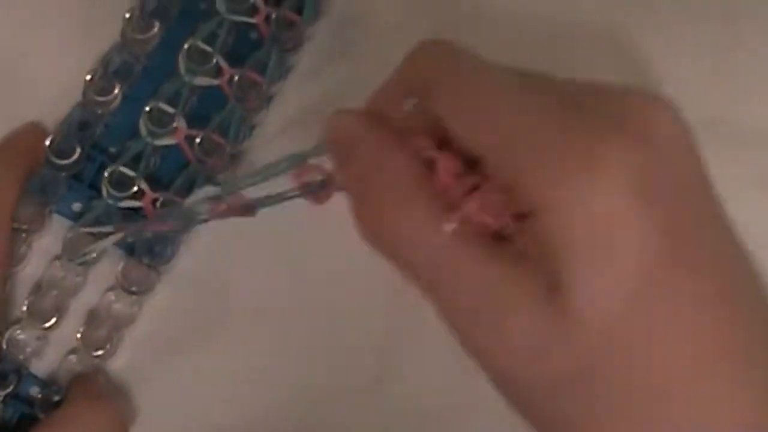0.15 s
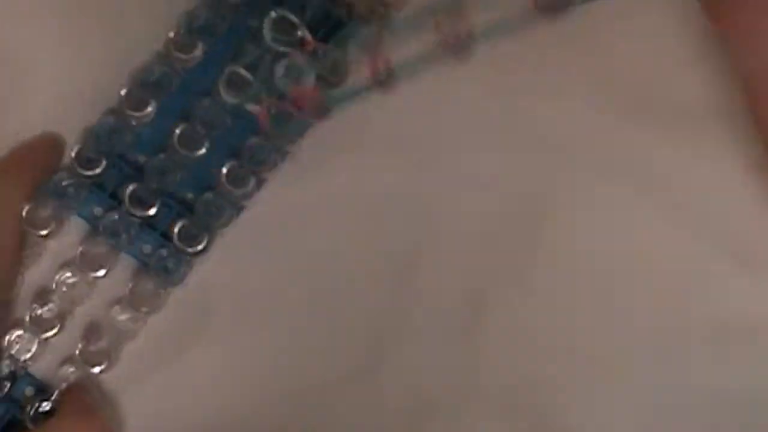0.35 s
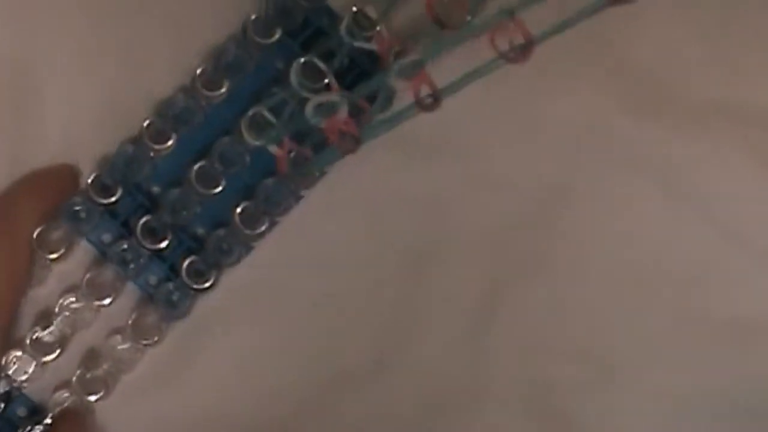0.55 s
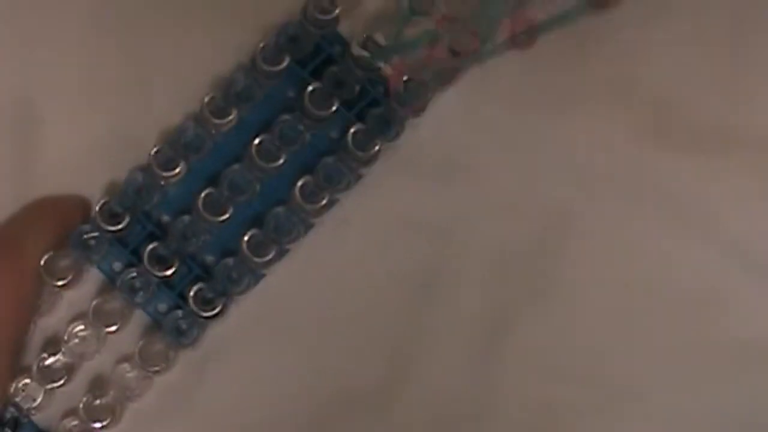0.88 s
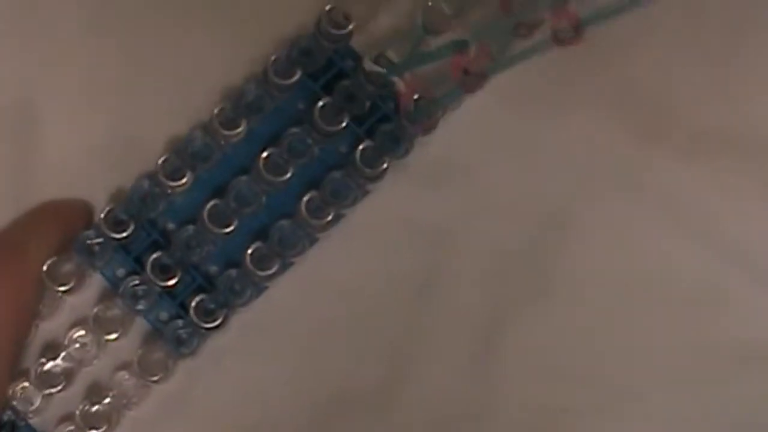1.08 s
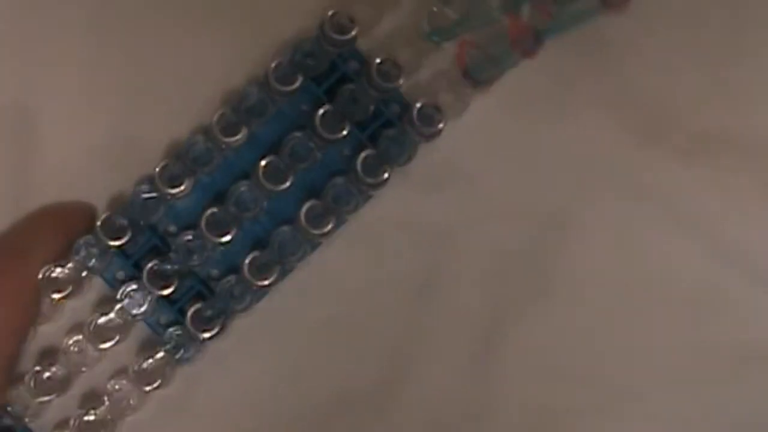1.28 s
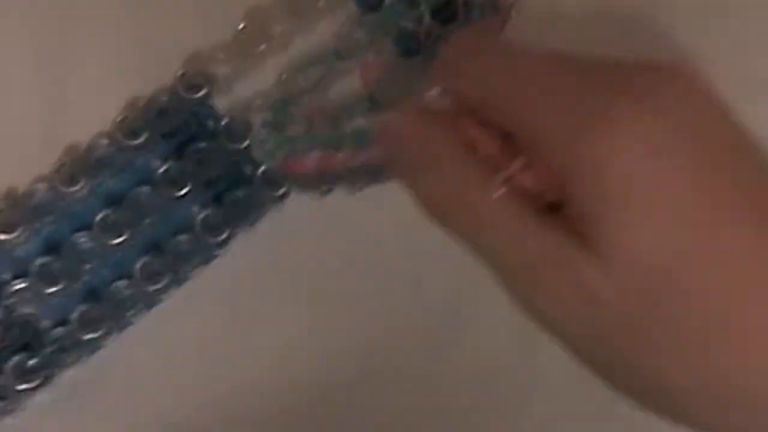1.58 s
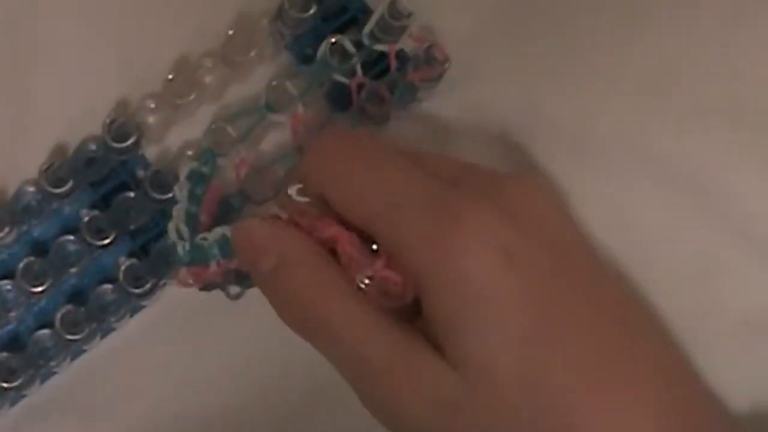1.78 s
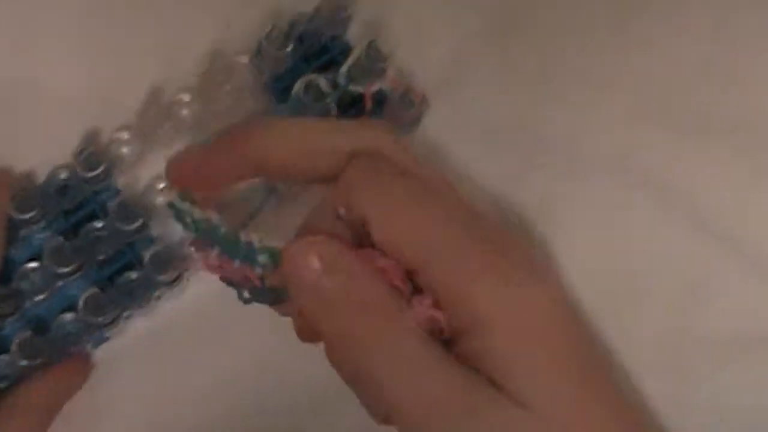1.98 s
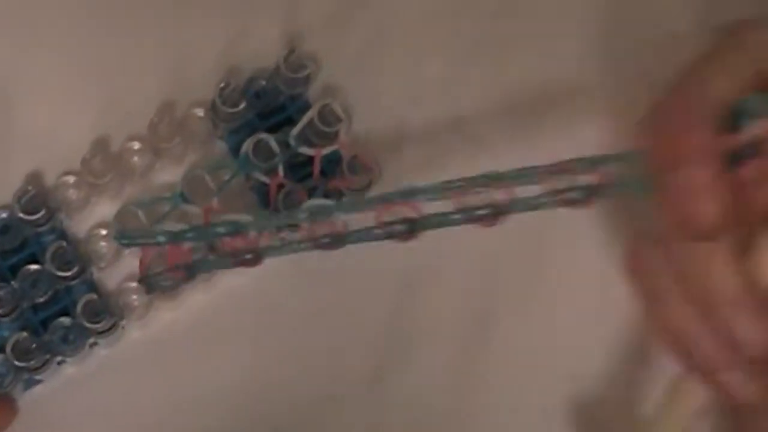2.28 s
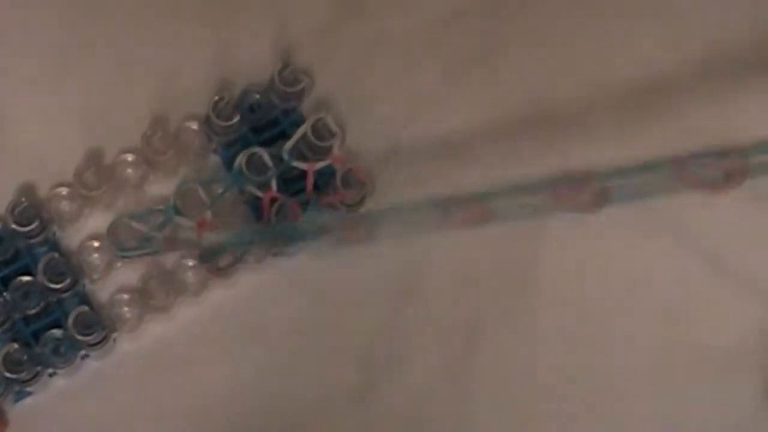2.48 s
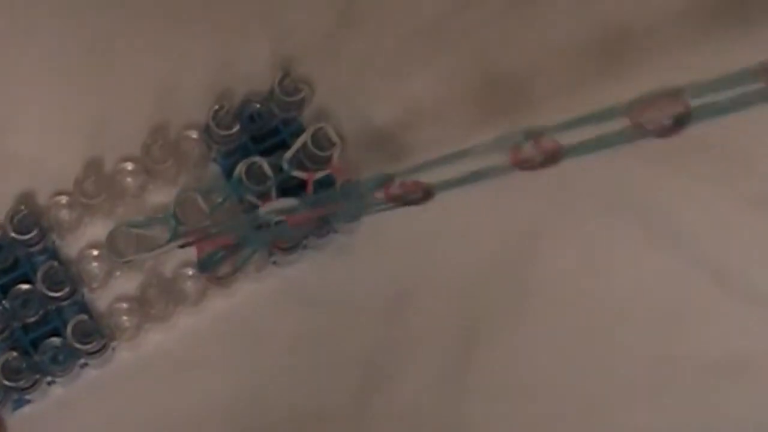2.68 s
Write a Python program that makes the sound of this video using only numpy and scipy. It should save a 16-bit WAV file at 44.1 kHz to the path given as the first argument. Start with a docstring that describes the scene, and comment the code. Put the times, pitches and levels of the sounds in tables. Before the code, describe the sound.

Rubber bands snap off plastic loom pegs in quick loud clusters, then a hand brushes cloth and the loom bumps down softly; two final snaps follow. Small room, close microphone, faint hiss and low hum.

```python
"""A plastic loom on a cloth-covered table in a small room, a small camera close by.
From the start: wide hiss, a faint wavering hum and tiny regular ticks of the camera. Rubber bands snap off the pegs
until 1.2 s: a few ms of rattling noise bands, then loom modes, a low body and a table thump, all decaying; the room
answers with a noise tail. From 1.3 s a hand and the loom brush the cloth as grainy noise; near 1.5 s the loom is
set down and bounces as low decaying sines. Two last snaps follow near 2.5 s; light noise taps fall throughout."""
import sys
import numpy as np
from scipy import signal
from scipy.fft import rfft, irfft
from scipy.io import wavfile
from scipy.ndimage import uniform_filter1d

SR = 44100
rng = np.random.default_rng(int(sys.argv[2]) if len(sys.argv) > 2 else 0)


def digitize_waveform(pressure):
    """Quantize a signal to 16-bit integers and store it at the path in sys.argv[1].

    Rows of a 2-D input are taken as channels; values are limited to [-1, 1].
    """
    field = np.atleast_2d(pressure).T
    bounded = np.clip(field, -1, 1)
    quanta = np.round(bounded * 32767).astype(np.int16)
    wavfile.write(sys.argv[1], SR, quanta)


N = 125685

# Hiss of room and microphone. Each row: frequency in Hz, relative density in dB per Hz.
AIR_TONE = [(15, -21), (30, -1), (50, 2), (65, -12.5), (85, 2.5), (150, -8), (300, -10.5), (600, -15),
            (1200, -22), (2500, -26.5), (4000, -28.5), (6000, -32.5), (10000, -37), (16200, -44)]
# Stereo width of the hiss. Each row: frequency in Hz, nominal side minus mid in dB.
AIR_WIDTH = [(40, 2), (120, 5), (250, 11), (800, 14), (3000, 13), (15000, 7.5)]
AIR_DB = -47.5  # mid level above 200 Hz

# Three hum tones, middle, deep and high. Each row: time in seconds, frequency in Hz, mid level in dB rms;
# pitch and level waver around these.
MIDDLE_HUM = [(0, 108.3, -38.5), (.6, 109, -42), (1.1, 108, -37), (1.45, 102.8, -42.5), (1.8, 98.8, -46),
              (2.1, 97, -48), (2.3, 95, -68), (2.6, 137, -63), (2.75, 138, -42.5), (2.85, 141, -37)]
DEEP_HUM = [(0, 56.04, -39), (0.598, 54.3, -46), (1.3, 54, -45.5), (1.8, 57, -57), (2.1, 56.96, -40),
            (2.4, 54.84, -44.5), (2.85, 57.8, -47.5)]
HIGH_HUM = [(0, 176, -82), (1.8, 170.8, -67), (2.001, 171.5, -48.5), (2.25, 176, -54), (2.45, 173, -56),
            (2.85, 176, -75)]
HUM_WAVER_DB, HUM_SIDE_DB = 1.5, -6.5

TICK_FIRST_S, TICK_GROUP_S, TICK_GAP_S, TICK_LENGTH_S = 0.05, 0.15, 1 / 30, 0.007
TICK_HZ, TICK_LOW_HZ, TICK_DB = 4034, 3310, -50

# Bands snapping off the pegs. Each row: start in seconds, overall level in dB, low ring in Hz, peg in Hz,
# sizzle in Hz, then levels in dB relative to the overall one and before the trims below: table, low body,
# rattle bands at 0.9k, 1.9k, peg, 5.5k, 9k and sizzle; left minus right in dB, rattle length in seconds,
# extra level in dB of the low ring, lower loom modes and upper loom modes, rise in seconds.
PEG_SNAPS = [(0.0302, -18.5, 350, 3070, 12600, -32, -27, -22, -20, -13.5, -10, -10.5, -40, -2, 0.0018, -7, -8, -20, 0.0014),
             (0.079, 0.5, 516, 3500, 12850, -39, -23.5, -22.5, -17, -11, -14, -21, -23, 0, 0.0034, -8, -6, -9, 0.00036),
             (0.1947, -5, 500, 3500, 12600, -27, -17.5, -12.5, -9, -7, -11, -16.5, -27, 0, 0.0035, -2.5, -10, -13, 0.00041),
             (0.215, -0.5, 477.6, 3590, 13300, -24.5, -22.5, -17, -14, -17.5, -10, -28, -21, -0.5, 0.0041, 2.5, 2, 3, 0.00033),
             (0.2223, 1.5, 331.7, 3640, 13400, -41, -28.5, -21.5, -17, -5, -19, -19.5, -26, -1, 0.0023, 6, 5, -22, 0.00033),
             (0.2758, -2.5, 330, 3580, 14900, -29, -33, -25.5, -14, -8.5, -18, -12, -29, -1, 0.0037, -9.5, 9.5, 10.5, 0.0006),
             (0.2804, 0.5, 348, 4020, 12600, -23.5, -22, -20, -19, -25, -11.5, -23.5, -29, 0.0, 0.0029, -3, 2, -15, 0.0006),
             (0.7367, -0.5, 323.5, 3570, 13100, -36, -25, -15, -9, -8, -11, -20, -19.5, 0, 0.0035, -10, -19, -8, 0.00093),
             (0.7414, 0, 351.4, 3290, 14200, -27.5, -17.5, -16, -14.5, -10, -12, -27, -16, -0.5, 0.003, -2, 5, 1, 0.0013),
             (0.8259, 1, 341, 3600, 14600, -31.5, -36, -24.5, -15.5, -11, -14, -24, -22.5, -1.5, 0.005, -2.5, -11, 1, 0.0005),
             (0.8296, -4, 397.5, 3230, 14400, -33, -23.5, -39, -6, -11.5, -23, -29, -29, 2.5, 0.002, -5.5, -14, -7, 0.00053),
             (0.8531, -4.5, 435, 3450, 14500, -25, -20, -23.5, -13, -9.5, -11.5, -22, -18, -0.5, 0.0039, -7, 1, -5, 0.00029),
             (1.1941, 1, 507, 3260, 14400, -30.5, -16, -14, -18.5, -6.5, -10, -18.5, -24, 0, 0.004, -0.5, 6, 1, 0.00044),
             (2.465, -1, 467, 2610, 12880, -34, -26, -18, -20.5, -14, -11, -20, -22, 0, 0.0042, -5.5, 3, -17, 0.00052),
             (2.571, -4.5, 331.2, 2500, 12900, -29, -32.5, -19, -15, -9, -14, -24, -20.5, -0.5, 0.0031, -5.5, -4.5, -0.5, 0.00056)]
# Rattle of the pegs. Each row: centre in Hz, nominal width in Hz, gain change in dB per rattle length
# (positive grows), tail relative to rattle in dB, tail t60 in seconds.
# The snap's own peg and sizzle pitches replace centres 2 and 5, counting from 0.
RATTLE_BANDS = [(910, 490, 7.5, -14.5, 0.23), (1805, 320, -1.5, -20.5, .35), (3450, 710, 4, -27, 0.37),
                (5420, 1420, -2.5, -21, 0.33), (9000, 6200, -4, -23, 0.2), (13500, 1600, -19, -25, 0.14)]
# Modes of the loom. Each row: frequency in Hz, level in dB before the snap's own, t60 in seconds,
# number of the rattle band it follows (from 0); tuning and level scatter from snap to snap.
LOOM_MODES = [(1700, -15, 0.055, 1), (1873, -6.5, 0.075, 1), (3260, -17, 0.071, 2), (3459, -11.5, 0.043, 2),
              (3810, -13, 0.04, 2), (4020, -38, 0.072, 2), (5060, -14.5, 0.051, 3), (5960, -38.5, 0.21, 3)]
RATTLE_TRIM_DB, RATTLE_FALL_S = 4.5, 0.0013
RATTLE_SIDE_DB, TAIL_SIDE_DB = -12, -1  # at 5 kHz, wider above
TAIL_SWELL_S, TAIL_WIDEN = 0.0018, 1.6
LOW_TRIM_DB, LOW_SWELL_S, LOW_T60_S, LOW_PAIR_RATIO = 2, 0.0065, 0.18, 1.05
BODY_HZ, BODY_WIDTH_HZ, BODY_T60_S, BODY_DB, BODY_SIDE = 393, 274, 0.13, 0.5, 0.14
TABLE_HZ, TABLE_TRIM_DB, TABLE_SWELL_S, TABLE_T60_S = 126.9, 4, 0.0069, 0.21

# Decay of the small room. Each row: frequency in Hz, t60 in seconds.
ROOM_T60 = [(125, 0.45), (500, 0.44), (2000, 0.41), (5000, 0.22), (10000, 0.11), (16000, 0.046)]
# Colour of the room's answer. Each row: frequency in Hz, relative level in dB.
ROOM_TONE = [(125, -5.5), (500, -11), (2000, -18), (5000, -12), (10000, -17), (16000, -17)]
ROOM_LIKENESS = 0.59  # 0: left and right unrelated, 1: alike

# Light taps and creaks. Each row: start in seconds, peak in dB, centre in Hz.
TAPS = [(0.048, -32, 3960), (0.055, -44, 4500), (0.474, -36.5, 9000), (1.34, -49, 9000),
        (1.507, -25.5, 845), (1.514, -27, 2140), (1.52, -24, 4760), (1.599, -32.5, 7000),
        (1.668, -39, 4970), (1.785, -46, 10260), (2.523, -43, 9000), (2.678, -36.5, 7000)]
TAP_DECAY_S = 0.0049

# Hand and loom brushing the cloth. Each row: time in seconds, mid level in dB, before the grain.
BRUSH_LEVEL = [(1.3, -65), (1.37, -56), (1.42, -45), (1.47, -50.5), (1.52, -41.5), (1.6, -44), (1.679, -51),
               (1.75, -56), (1.882, -57), (1.96, -44.5), (2.031, -45), (2.11, -49.5), (2.171, -60),
               (2.3, -74)]
# Colour of the cloth. Each row: frequency in Hz, relative level in dB.
BRUSH_TONE = [(180, -25), (300, -9), (850, -7.5), (1500, -11), (3000, -14), (5500, -21), (8000, -19.5),
              (12000, -24.5), (16000, -30)]

# Loom set down, and its bounce. Each row: start in seconds, level of the low tone in dB, frequency in Hz,
# t60 in seconds.
THUDS = [(1.519, -9, 120, 0.062), (1.565, -25, 135, 0.054)]
THUD_KNOCK_HZ, THUD_KNOCK_DB = 342, -13  # dB relative to the low tone

CLIP_LEVEL, TOP_HZ = 1.0, 15900


def undb(db):
    """dB to gain."""
    return 10 ** (np.asarray(db) / 20)


def on_log(hz, table):
    """Table value at hz, read on a log frequency axis."""
    points = np.array(table)
    return np.interp(np.log(np.maximum(hz, 1)), np.log(points[:, 0]), points[:, 1])


def coloured(table, size):
    """Noise with a (Hz, dB) spectrum above 22 Hz, rms 1."""
    f = np.arange(size // 2 + 1) * SR / size
    spectrum = rfft(rng.standard_normal(size)) * undb(on_log(f, table)) * (f > 22)
    x = irfft(spectrum, size)
    return x / x.std()


def band(x, hz, width_hz):
    """Causal two-pole band-pass applied twice."""
    b, a = signal.iirpeak(min(hz, 0.45 * SR), hz / width_hz * 0.6, fs=SR)
    return signal.lfilter(b, a, signal.lfilter(b, a, x))


def swell_and_die(t, swell_s, t60):
    """Envelope that builds up while it decays by 60 dB per t60."""
    return (1 - np.exp(-t / swell_s)) * 1000. ** (-t / t60)


def ring(hz, t60, swell_s, size):
    """A sine mode that swells and dies, peak near 1."""
    t = np.arange(size) / SR
    env = swell_and_die(t, swell_s, t60)
    return env / env.max() * np.sin(2 * np.pi * hz * t)


def walk(rate):
    """Slow random wander, spread 1."""
    k = int(SR / rate)
    x = uniform_filter1d(uniform_filter1d(rng.standard_normal(N), k), k)
    return x / x.std()


def left_right(mid, side):
    """Mid and side to a stereo pair."""
    return np.array([mid + side, mid - side])


def add(out, x, s, pan_db=0):
    """Mix x into both channels at time s, pan_db louder on the left."""
    i = int(s * SR)
    k = min(x.shape[-1], N - i)
    out[:, i:i + k] += x[..., :k] * undb(np.array([[pan_db], [-pan_db]]) / 2)


def air():
    """Room and microphone hiss: coloured noise, its side stronger than its mid."""
    mid = coloured(AIR_TONE, N)
    wide = [(hz, db + on_log(hz, AIR_WIDTH)) for hz, db in AIR_TONE]
    # The bass holds most of the power, so it sets the overall width.
    side = undb(on_log(40, AIR_WIDTH)) * coloured(wide, N)
    highpass = signal.butter(4, 200, "high", fs=SR, output="sos")
    rms_above_200 = signal.sosfilt(highpass, mid).std()
    return undb(AIR_DB) / rms_above_200 * left_right(mid, side)


def hum():
    """Three faint low sines that drift and waver, with a quarter-turned copy as side."""
    t, out = np.arange(N) / SR, 0
    for path in map(np.array, (MIDDLE_HUM, DEEP_HUM, HIGH_HUM)):
        hz = np.interp(t, path[:, 0], path[:, 1]) * (1 + 0.0154 * walk(10.5))
        phase = 2 * np.pi * np.cumsum(hz) / SR
        level_db = np.interp(t, path[:, 0], path[:, 2]) + HUM_WAVER_DB * walk(11)
        tone = left_right(np.sin(phase), undb(HUM_SIDE_DB) * np.cos(phase))
        out = out + np.sqrt(2) * undb(level_db) * tone
    return out


def ticks():
    """Camera ticks, short two-tone bursts: four, a slightly longer gap, four again."""
    groups = np.arange(TICK_FIRST_S - TICK_GROUP_S, N / SR, TICK_GROUP_S)
    starts = (groups[:, None] + TICK_GAP_S * np.arange(4)).ravel()
    gains = undb(1.5 * rng.standard_normal(len(starts)))
    keep = (starts > 0) & (starts < N / SR)
    impulses = np.zeros(N)
    impulses[(starts[keep] * SR).astype(int)] = gains[keep]
    t = np.arange(int(TICK_LENGTH_S * SR)) / SR
    tones = np.sin(2 * np.pi * TICK_HZ * t) + 0.81 * np.sin(2 * np.pi * TICK_LOW_HZ * t)
    return undb(TICK_DB) * signal.fftconvolve(impulses, np.hanning(len(t)) * tones, mode="same")


def peg_rattle(centres, levels_db, length_s, rise_s, t):
    """Pegs rattle as gated noise in six bands; a wider diffuse tail of each is returned apart."""
    gate = np.minimum(t / rise_s, 1) ** 2 * np.exp(-np.maximum(t - length_s, 0) / RATTLE_FALL_S)
    rattle, tail = np.zeros((2, 2, len(t)))
    for hz, level_db, (_, width_hz, slope_db, tail_db, t60) in zip(centres, levels_db, RATTLE_BANDS):
        gain = undb(level_db + RATTLE_TRIM_DB)
        noise = rng.standard_normal((4, len(t)))
        mid, side = band(noise[:2] * gate * undb(slope_db * t / length_s), hz, width_hz)
        side = side * undb(RATTLE_SIDE_DB) * np.sqrt(hz / 5000)
        rms = np.sqrt(np.sum(mid ** 2) / np.sum(gate ** 2))
        rattle += gain * left_right(mid, side) / rms / 2
        mid, side = band(noise[2:], hz, width_hz * TAIL_WIDEN)
        side = side * undb(TAIL_SIDE_DB) * (hz / 5000) ** 0.52
        fade = swell_and_die(t, TAIL_SWELL_S, t60)
        tail += gain * undb(tail_db) * fade * left_right(mid, side) / mid.std() / 2
    return rattle, tail


def loom_ring(levels_db, lower_db, upper_db, size):
    """Modes of the loom ring at the strength of their rattle band, each a little off in tuning and level."""
    out = np.zeros(size)
    for hz, mode_db, t60, k in LOOM_MODES:
        level_luck, tuning_luck = rng.standard_normal(2)
        group_db = lower_db if k == 1 else upper_db
        gain = undb(levels_db[k] + RATTLE_TRIM_DB + group_db + mode_db + 2 * level_luck)
        out += gain * ring(hz * (1 + 0.0049 * tuning_luck), t60, 0.0005, size)
    return out


def low_body(low_hz, ring_db, t):
    """A slowly swelling low body: two close tones that beat, plus band-passed noise."""
    tones = ring(low_hz, LOW_T60_S, LOW_SWELL_S, len(t))
    tones += 0.49 * ring(low_hz * LOW_PAIR_RATIO, LOW_T60_S, LOW_SWELL_S, len(t))
    mid, side = rng.standard_normal((2, len(t)))
    noise = band(left_right(mid, BODY_SIDE * side), BODY_HZ, BODY_WIDTH_HZ)
    fade = swell_and_die(t, LOW_SWELL_S, BODY_T60_S)
    return undb(ring_db) * tones + undb(BODY_DB) * fade * noise / noise.std()


def snaps():
    """Each snap sums peg rattle, loom modes, low body and a table thump; diffuse tails come apart."""
    out, tails = np.zeros((2, 2, N))
    size = SR // 3
    t = np.arange(size) / SR
    for (s, db, low_hz, peg_hz, sizzle_hz, table_db, low_db, *levels_db,
         pan_db, length_s, ring_db, lower_db, upper_db, rise_s) in PEG_SNAPS:
        centres = [row[0] for row in RATTLE_BANDS]
        centres[2], centres[5] = peg_hz, sizzle_hz
        snap, tail = peg_rattle(centres, levels_db, length_s, rise_s, t)
        snap += loom_ring(levels_db, lower_db, upper_db, size)
        snap += undb(low_db + LOW_TRIM_DB) * low_body(low_hz, ring_db, t)
        snap += undb(table_db + TABLE_TRIM_DB) * ring(TABLE_HZ, TABLE_T60_S, TABLE_SWELL_S, size)
        add(out, snap * undb(db), s, pan_db)
        add(tails, tail * undb(db), s)
    return out, tails


def room(x):
    """The room's noise tail, each band with its own decay, partly alike left and right."""
    size = SR // 2
    t, tail = np.arange(size) / SR, np.zeros((2, size))
    for hz in 125 * 2 ** np.arange(0, 7.1, 0.5):  # half-octave steps
        mid, side = band(rng.standard_normal((2, size)), hz, hz / 3.16)
        env = np.minimum(t / 0.0032, 1) ** 2 * 1000. ** (-t / on_log(hz, ROOM_T60))
        pair = left_right(mid * np.sqrt(1 + ROOM_LIKENESS), side * np.sqrt(1 - ROOM_LIKENESS))
        tail += undb(on_log(hz, ROOM_TONE)) * env * pair / 40
    return signal.fftconvolve(x.mean(0)[None], tail)[:, :N]


def taps():
    """Light taps and creaks: decaying noise through a broad band-pass."""
    out, size = np.zeros((2, N)), SR // 4
    t = np.arange(size) / SR
    for s, db, hz in TAPS:
        x = band(rng.standard_normal(size) * np.exp(-t / TAP_DECAY_S), hz, 0.66 * hz)
        add(out, undb(db) * x / np.abs(x).max(), s)
    return out


def brush():
    """Rubbing on cloth: coloured noise whose level flutters quickly into grain."""
    t, path = np.arange(N) / SR, np.array(BRUSH_LEVEL)
    level_db = np.interp(t, path[:, 0], path[:, 1], left=-99, right=-99)
    env = undb(level_db + 1.9 * walk(60))
    mid, side = coloured(BRUSH_TONE, N), coloured(BRUSH_TONE, N)
    return env * np.array([mid + 0.34 * side, mid - 0.79 * side])


def thuds():
    """The loom meets the table: a low decaying sine with a shorter knock above it."""
    out, size = np.zeros((2, N)), SR // 4
    for s, db, hz, t60 in THUDS:
        low = -ring(hz, t60, 0.0021, size)  # first swing is negative
        knock = undb(THUD_KNOCK_DB) * ring(THUD_KNOCK_HZ, t60 * 0.63, 0.001, size)
        add(out, undb(db) * (low + knock), s)
    return out


def scene():
    """Near sounds, the room's answer to them, the cloth, and the floor of hiss, hum and ticks."""
    floor = air() + hum() + ticks()
    snap, tails = snaps()
    near = snap + taps() + thuds()
    return floor + near + tails + room(near) + brush()


def record(dry):
    """Peaks beyond full scale clip; a steep low-pass cuts the top."""
    lowpass = signal.ellip(8, 0.2, 70, TOP_HZ, fs=SR, output="sos")
    return signal.sosfilt(lowpass, np.clip(dry, -CLIP_LEVEL, CLIP_LEVEL))


dry = scene()
out = record(dry)
digitize_waveform(out)
```